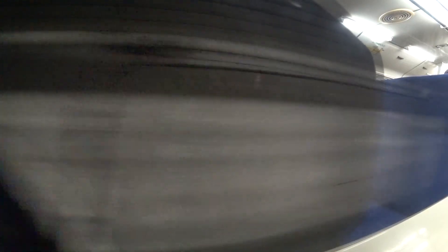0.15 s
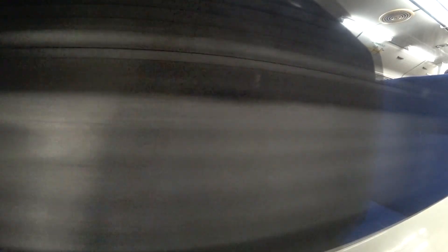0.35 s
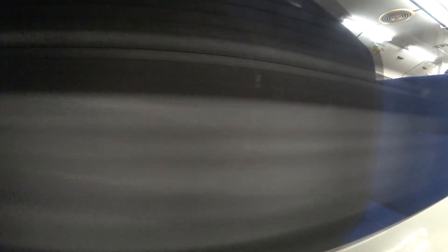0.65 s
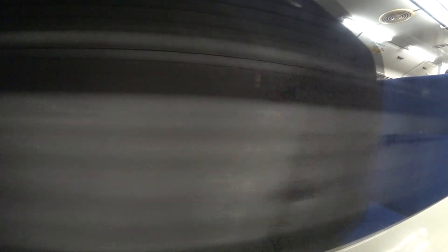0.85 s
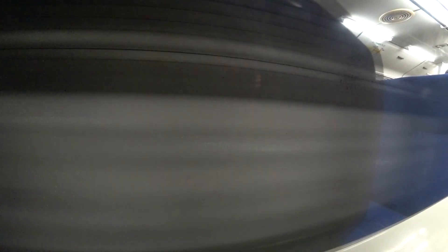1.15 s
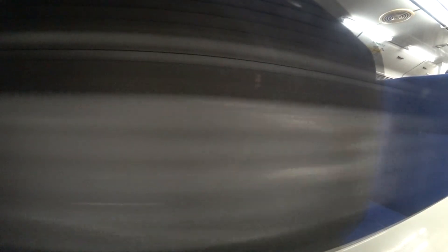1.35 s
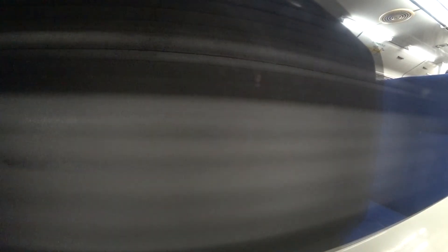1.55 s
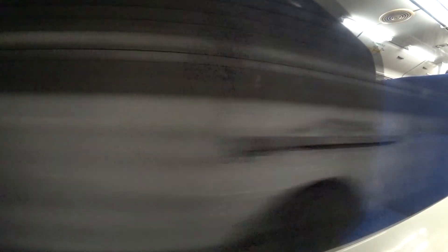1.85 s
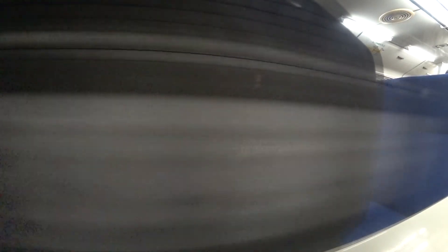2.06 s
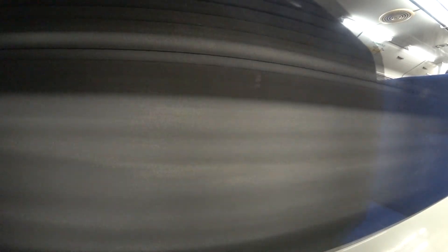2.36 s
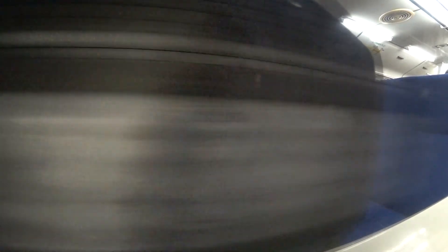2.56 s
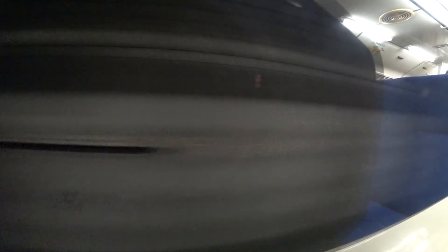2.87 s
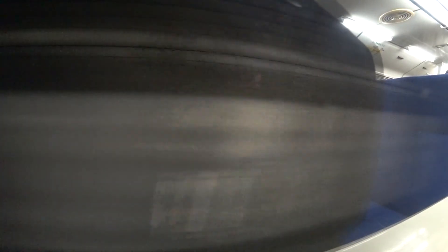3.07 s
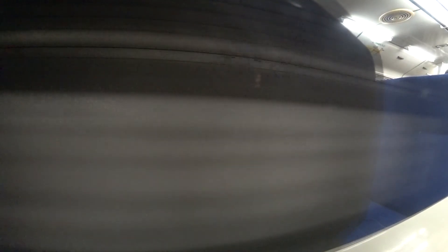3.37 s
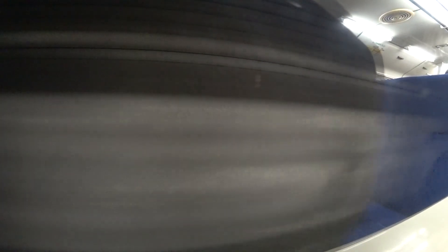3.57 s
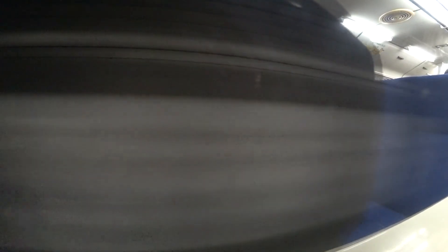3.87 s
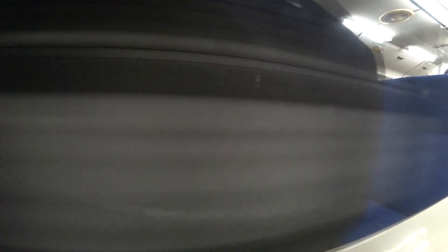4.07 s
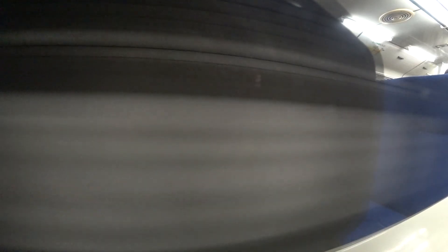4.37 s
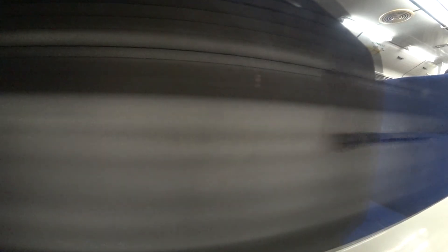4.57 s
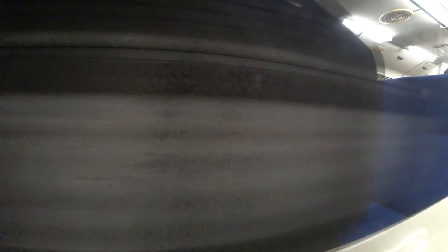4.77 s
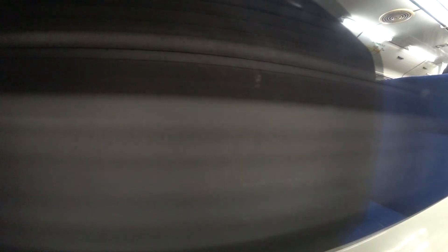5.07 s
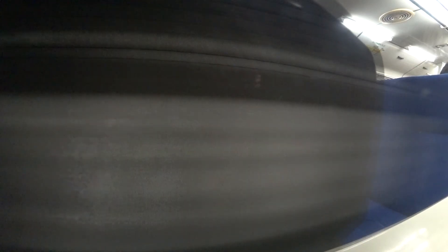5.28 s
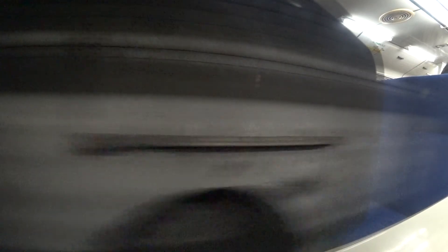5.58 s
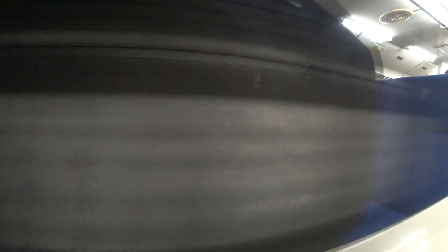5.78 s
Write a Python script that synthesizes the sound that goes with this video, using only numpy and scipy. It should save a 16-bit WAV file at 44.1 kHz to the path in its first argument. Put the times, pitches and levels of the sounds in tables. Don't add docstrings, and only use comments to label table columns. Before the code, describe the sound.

Inside a moving diesel railcar in a tunnel, an underfloor engine drones steadily, its pitch creeping up almost imperceptibly. Very low heaves, booms and panel drumming swell irregularly beneath it. Gear whine, rolling wheels and breathy tunnel roar fill the middle, with faint seal hiss and turbo whistle above. Fixed stereo microphone in the cabin; bass centred, upper noise wide.

```python
import sys
import numpy as np
from scipy import signal
from scipy.fft import rfft, irfft, next_fast_len
from scipy.io import wavfile
from scipy.ndimage import uniform_filter1d

SR = 44100
rng = np.random.default_rng(int(sys.argv[2]) if len(sys.argv) > 2 else 0)


def gain_from_decibels(decibels):
    exponent = np.asarray(decibels, float) / 20
    return 10 ** exponent


def unload_audio(sound):
    columns = np.transpose(np.atleast_2d(sound))
    steps = np.round(np.clip(columns, -1, 1) * 32767)
    wavfile.write(sys.argv[1], SR, steps.astype(np.int16))


N = 261513
SHAFT_ORDER = 2.222

# [start_s, cycles_per_s]
ENGINE_SPEED = [(0, 15.4423), (1.5, 15.5016), (3, 15.5627), (4.5, 15.6258), (6, 15.6909)]
# [order, left_db, right_db, right_lead_rad]
ENGINE_ORDERS = [(6, -28, -29, 0), (7, -48, -50, -.5), (9, -43, -46, 1.2), (10, -48, -52, .4),
                 (11, -42, -48, -.4), (12, -42, -40, .4), (13, -50, -53, .3), (14, -42, -46, -.8),
                 (15, -49, -47, 1.2), (16, -53, -52, .6), (17, -56, -50, -.2), (18, -62, -51, 1.7),
                 (20, -54, -57, .2), (21, -52, -64, -.3), (22, -55, -54, 1.4), (23, -62, -53, .5),
                 (25, -50, -47, .1), (27, -55, -56, 1.1), (28, -57, -49, 1.7), (30, -58, -56, -.6),
                 (32, -59, -52, 0), (33, -54, -53, .4), (35, -46, -54, 2.6), (36, -61, -50, -2.3),
                 (37, -55, -50, -1.1), (38, -51, -55, .8), (42, -56, -52, -2.8), (44, -57, -57, 1.8),
                 (45, -64, -54, 3), (51, -68, -56, 2.5)]
FLOOR_RISE = {6: -1, 9: 9, 11: 8, 12: 5, 14: 1, 25: -8}
# [order, left_db, right_db, right_lead_rad]
DRIVELINE_TONES = [(14.24, -50, -47, 1.8), (28.475, -63, -50, -2.9), (73.43, -61, -56, 3.1),
                   (77.16, -63, -57, -.9), (117.34, -68, -60, -.6), (2.222, -33, -31, 0)]
MESH_TONES = [(114.68, .5), (70.49, .6), (140.97, .4), (96, 0), (98.68, .45), (26, 0), (20.17, 0)]
# [order, left_delay_ms, left_db, right_delay_ms, right_db]
MESH_PATHS = [(114.68, 23.07, -69.0, 3.75, -62.0), (114.68, 63.23, -48.2, 18.45, -55.3),
              (114.68, 123.75, -48.6, 125.84, -48.6), (114.68, 140.28, -47.8, 165.27, -55.3),
              (114.68, 160.68, -50.6, 206.3, -55.0), (114.68, 165.43, -54.9, 239.53, -57.0),
              (70.49, 5.18, -66.5, 3.79, -52.5), (70.49, 65.99, -58.3, 74.53, -50.6),
              (70.49, 127.18, -63.0, 148.36, -58.1), (140.97, 21.43, -61.0, 4.09, -57.3),
              (140.97, 87.38, -56.6, 26.21, -56.6), (140.97, 94.02, -56.1, 90.69, -55.3),
              (96, 18.15, -60.6, 3.73, -49.2), (96, 77.54, -62.6, 10.08, -50.3),
              (96, 123.77, -60.0, 80.37, -55.5), (98.68, 8.73, -60.4, 4.02, -55.6),
              (98.68, 49.03, -64.3, 49.42, -61.9), (98.68, 87.71, -61.4, 113.45, -63.5),
              (26, 17.99, -48.1, 3.79, -39.6), (26, 93.8, -46.6, 29.8, -41.6),
              (26, 313.42, -56.3, 325.05, -50.8), (20.17, 4.35, -52.4, 4.36, -58.6),
              (20.17, 193.37, -45.8, 193.44, -50.8), (20.17, 505.04, -54.1, 492.19, -54.6)]

# [heave_db, boom_db, drumming_db]
BODY_REST = (-25, -22.5, -26)
# [pitch_hz, level_db_per_hz]
HEAVE_SPECTRUM = [(1, -14), (3, -6), (6, -6), (8.3, 0), (11, -6), (14, -6), (17, -30)]
# [pitch_hz, level_db_per_hz]
BOOM_SPECTRUM = [(11, -30), (14, -4), (18.5, -4), (21, 2), (24, -4), (32, -10), (38, -13), (44, -35)]
# [pitch_hz, level_db_per_hz]
DRUMMING_SPECTRUM = [(32, -25), (38, -1), (52, -3), (62, -.5), (68, -4), (80, 1.5), (88, -7), (100, -14),
                     (112, -40)]
# [start_s, level_db over rest, length_s]
TRACK_LURCHES = [(0, -6, 0.038), (.4, 2, 0.11), (.81, 10, 0.085), (1.05, 8, .08), (1.28, -1, .06),
                 (1.62, 10, 0.089), (1.95, 4, 0.25), (2.75, 4.5, 0.62), (3.5, 9, 0.23), (4.15, 3.5, 0.086),
                 (4.42, -3, .06), (4.65, 3, 0.054), (5.02, 7.5, 0.16), (5.4, 8.5, 0.11), (5.82, 9, 0.28)]
# [start_s, level_db over rest, length_s]
PRESSURE_WAVES = [(0, -2, 0.1), (.24, 6, 0.091), (.45, 5, 0.16), (.9, 1.5, 0.19), (1.38, -10, 0.088),
                  (1.57, 6.5, 0.17), (1.74, -9, 0.036), (1.88, 5, 0.066), (2.15, 5.5, 0.24),
                  (2.55, 7.5, 0.2), (3.45, 6.5, 0.43), (3.84, -3.5, .06), (4.07, 4.5, 0.056),
                  (4.5, 2, 0.29), (5.02, 4, 0.1), (5.48, 4, 0.37), (5.93, -7, 0.061)]
# [start_s, level_db over rest, length_s]
ROUGH_LENGTHS = [(.36, 5.5, .07), (.62, 7.5, 0.075), (.95, 2.5, 0.25), (1.3, 2, 0.1), (2.0, 6, 0.067),
                 (2.5, 4, 0.12), (2.8, 5, .08), (3.02, -6, 0.052), (3.2, 0.5, 0.25), (3.45, 4.5, 0.073),
                 (4.47, 3.5, 0.079), (5.1, -2, 0.1), (5.53, 7, 0.085), (5.75, 0, 0.12)]

# [start_s, rolling_db, roar_db]
WHEEL_LEVELS = [(0, -33.5, -35.5), (1.5, -31.5, -35.5), (3, -32.5, -35.4), (4.5, -32, -35.5),
                (5.93, -32.5, -35)]
# [pitch_hz, level_db_per_hz]
ROLLING_SPECTRUM = [(80, -60), (100, -2.5), (150, -1), (180, -5), (250, -7.5), (300, -8), (400, -8),
                    (480, -10), (600, -10.5), (750, -18.5), (900, -34)]
# [pitch_hz, level_db_per_hz]
ROAR_SPECTRUM = [(550, -23), (720, -5), (1000, -5), (1180, -5.5), (1330, -10), (1600, -10), (2000, -7.5),
                 (2400, -9), (2800, -11.5), (3500, -12.5), (3900, -16), (4800, -28.5), (5600, -53.5),
                 (8000, -65)]
# [pitch_hz, width_hz, level_db over the roar]
WHEEL_MODES = [(802, 30, 3), (905, 110, 7), (1485, 130, 4), (1793, 70, 5.5), (2227, 150, 3), (3140, 250, 1),
               (4100, 200, 2.5)]
# [pitch_hz, level_db_per_hz]
AIR_SPECTRUM = [(3500, -22), (5000, 0), (5900, 0), (6400, -1), (7000, -2), (9500, -6), (11000, -9.5),
                (12000, -14), (15700, -18), (17000, -22)]

# [pitch_hz, left_right_likeness from -1 to 1]
EAR_LIKENESS = [(5, 1), (90, .99), (130, 0.99), (190, 0.74), (280, 0.38), (410, 0.08), (590, -0.38),
                (1000, -0.06), (2740, -0.13), (4020, 0.041), (12000, -0.14)]
# [pitch_hz, left_minus_right_db]
EAR_LEAN = [(10, -1), (60, -1.5), (150, 3.5), (240, -1), (390, -1.5), (990, -5), (1580, -2.5), (2520, -2.5),
            (4020, -1.5), (8000, -1.5), (13000, 2)]

# [start_s, blade_tone_hz]
TURBO_PITCH = [(0, 10490), (3, 10525), (6, 10560)]
# [start_s, level_db, length_s]
TURBO_SURGES = [
    (.95, 3, .1),
    (1.75, 5, .1),
    (2.15, 3, .08),
    (3.62, 4.5, .1),
    (5.45, 3, .12),
]
# [start_s, level_db, length_s]
TRIM_RUSTLES = [
    (.099, -66, .006),
    (.112, -68, .006),
    (1.345, -72, .005),
    (2.12, -70, .025),
    (2.2, -72, .04),
    (4.02, -72, .05),
]


def unit(x):
    return x / np.sqrt(np.mean(x ** 2) + 1e-20)


def along(points, hz):
    f, v = np.transpose(points)
    return np.interp(np.log(hz + 1), np.log(f + 1), v)


def curves(rows):
    s, *cols = np.transpose(rows)
    return np.array([np.interp(np.arange(N) / SR, s, c) for c in cols])


def wobble(rate, size=N):
    knots = rng.standard_normal(int(N * rate / SR) + 4)
    return np.interp(np.linspace(0, N * rate / SR, size), np.arange(len(knots)), knots)


def swells(events):
    t = np.arange(N) / SR
    return sum(db * np.exp(-((t - s) / length) ** 2) for s, db, length in events)


def rush(spectrum, patchy_db=0, modes=()):
    z = signal.stft(rng.standard_normal((2, N + 8192)), nperseg=512)[2]
    patches = uniform_filter1d(rng.standard_normal(z.shape[1:]), 5, 0)
    patches = unit(uniform_filter1d(patches, 16, 1))
    pair = signal.istft(z * gain_from_decibels(patchy_db * patches), nperseg=512)[1]

    m = next_fast_len(pair.shape[1])
    hz = np.fft.rfftfreq(m, 1 / SR)
    ring_db = sum(db / (1 + (2 * (hz - centre_hz) / width) ** 2) for centre_hz, width, db in modes)
    colour = gain_from_decibels(along(spectrum, hz) + ring_db) * (hz < spectrum[-1][0])
    turn = np.arccos(np.clip(along(EAR_LIKENESS, hz), -1, 1)) / 2
    mid, side = rfft(pair, m) * colour * [np.cos(turn), np.sin(turn)]
    lean = gain_from_decibels(along(EAR_LEAN, hz) / 2)
    x = irfft([(mid + side) * lean, (mid - side) / lean], m)[:, :N]
    return x / np.sqrt(np.mean(x.mean(0) ** 2))


def steadied(x, seconds):
    size = int(seconds * SR)
    power = uniform_filter1d(uniform_filter1d(x.mean(0) ** 2, size), size)
    return x / np.sqrt(np.abs(power) + .08)


def full_rate(x):
    return signal.resample_poly(x, 6, 1, axis=1, padtype="line")[:, :N]


def tones(cycle, table, drift_db):
    turn = cycle[::6]
    size = len(turn)
    out = np.zeros((2, size))
    run = np.linspace(-.5, .5, size)
    for order, left_db, right_db, lead in table:
        angle = order * turn + 2 * np.pi * rng.random() + 0.23 * wobble(1.43, size)
        rise_db = FLOOR_RISE.get(order, 0) * run
        for ear, db in enumerate((left_db, right_db)):
            drift = drift_db * min(order / 12, 1) * wobble(2.457, size)
            out[ear] += gain_from_decibels(db + 3 + rise_db + drift) * np.sin(angle + ear * lead)
    return full_rate(out)


def engine(cycle):
    strong = np.transpose(ENGINE_ORDERS)[0]
    weak = []
    for k, (a, b, c) in enumerate(rng.standard_normal((81, 3))):
        if k > 18 and k not in strong and k != 26:
            weak.append((k, -60 - k / 14 + 3 * a, -57 - k / 14 + 3 * b, 3 * c))
    return gain_from_decibels(-0.2) * tones(cycle, ENGINE_ORDERS, drift_db=1.5) + gain_from_decibels(-5.0) * tones(cycle, weak, drift_db=5.5)


def gears(cycle):
    speed, turn = curves(ENGINE_SPEED)[0][::6], cycle[::6]
    lesser = gain_from_decibels(1.5) * tones(cycle, DRIVELINE_TONES, drift_db=0.5)
    whine = np.zeros((2, len(turn)))
    for order, sway in MESH_TONES:
        run_out = sway * np.sin(SHAFT_ORDER * turn)
        angle = order * turn + run_out + order / 400 * wobble(2, len(turn))
        swell = 1 + .2 * sway * np.cos(SHAFT_ORDER * turn)
        for path_order, left_ms, left_db, right_ms, right_db in MESH_PATHS:
            if path_order == order:
                lag = 2 * np.pi * order * speed * np.array([[left_ms], [right_ms]]) / 1000
                level = gain_from_decibels(np.array([[left_db], [right_db]]) + 3 + 4.5 * sway)
                whine += level * swell * np.sin(angle - lag)
    return lesser + full_rate(whine)


def body():
    heave_db, boom_db, drum_db = BODY_REST
    heave = gain_from_decibels(heave_db + swells(TRACK_LURCHES)) * steadied(rush(HEAVE_SPECTRUM), .15)
    boom = gain_from_decibels(boom_db + swells(PRESSURE_WAVES)) * steadied(rush(BOOM_SPECTRUM), .14)
    drumming = gain_from_decibels(drum_db + swells(ROUGH_LENGTHS)) * steadied(rush(DRUMMING_SPECTRUM), .13)
    return heave + boom + drumming


def track():
    rolling_db, roar_db = curves(WHEEL_LEVELS)
    rolling = gain_from_decibels(rolling_db - 1.0) * rush(ROLLING_SPECTRUM, patchy_db=0.1)
    roar = gain_from_decibels(roar_db - 2.5) * rush(ROAR_SPECTRUM, patchy_db=.5, modes=WHEEL_MODES)
    hiss = gain_from_decibels(-62.0 + 0.27 * wobble(3.3)) * rush(AIR_SPECTRUM, patchy_db=.3)
    return rolling + roar + hiss


def turbo():
    hz = curves(TURBO_PITCH)[0] + 15 * wobble(5.6) + 80 * wobble(300)
    angle = 2 * np.pi * np.cumsum(hz) / SR
    flutter = gain_from_decibels(3 * np.array([wobble(90), wobble(90)]))
    ear_phase = np.array([wobble(44), wobble(40)])
    blades = gain_from_decibels(-69.5) * flutter * np.sin(angle + ear_phase)
    skirt = rush([(9000, -43), (10100, -6), (10520, 2), (11000, -8), (11600, -15), (13000, -40)], patchy_db=.7)
    leak = rush([(10300, -25), (10900, 0), (11500, -2), (12500, -10), (13500, -30)], patchy_db=2.5)
    return blades + gain_from_decibels(-72.5) * skirt + gain_from_decibels(-85 + 2 * swells(TURBO_SURGES)) * leak


def trim():
    t = np.arange(N) / SR
    swell = sum(gain_from_decibels(db - 9 * ((t - s) / length) ** 2) for s, db, length in TRIM_RUSTLES)
    return swell * rush([(4500, -12), (8000, -3), (13000, 0), (16000, -7)], patchy_db=2.5)


def scene():
    cycle = 2 * np.pi * np.cumsum(curves(ENGINE_SPEED)[0]) / SR
    return engine(cycle) + gears(cycle) + body() + track() + turbo() + trim()


def top_cut(x):
    return signal.sosfilt(signal.butter(12, 15730, fs=SR, output="sos"), x)


def record(dry):
    soft = dry / (1 + np.abs(dry / .75) ** 5) ** (1 / 5)
    return top_cut(soft)


dry = scene()
out = record(dry)
unload_audio(out)
```